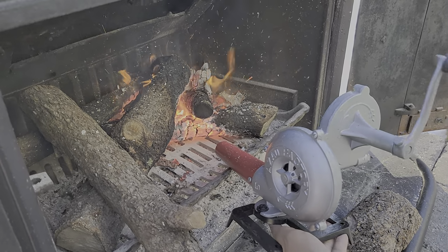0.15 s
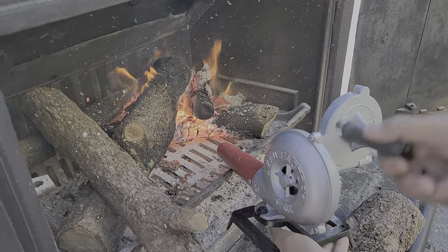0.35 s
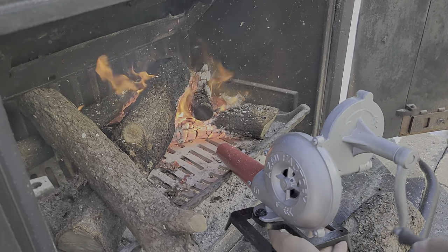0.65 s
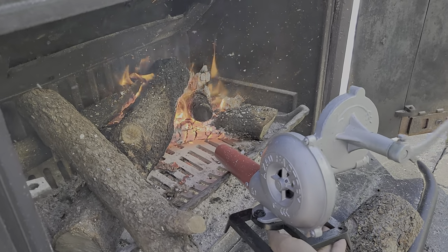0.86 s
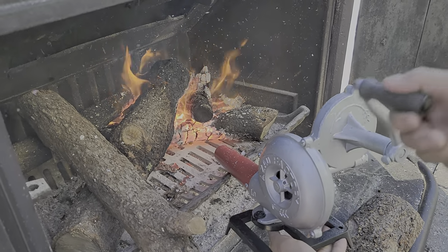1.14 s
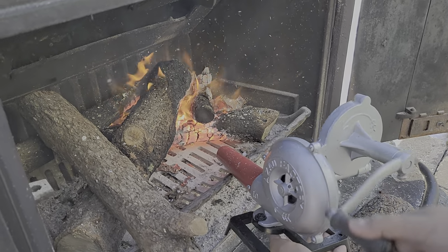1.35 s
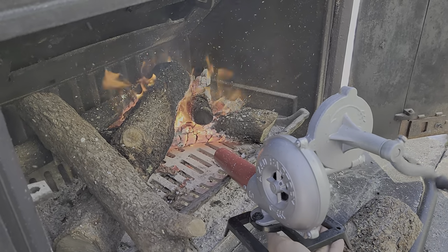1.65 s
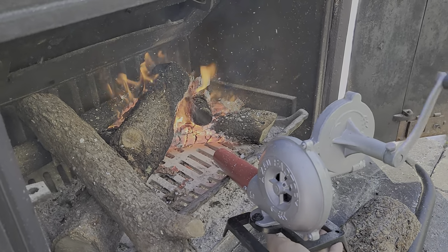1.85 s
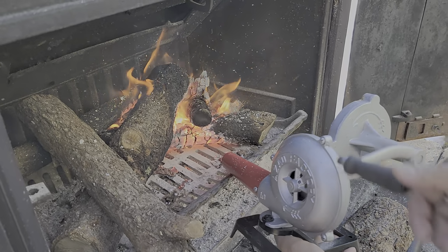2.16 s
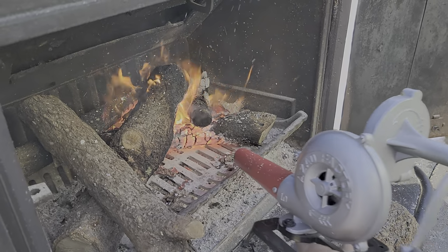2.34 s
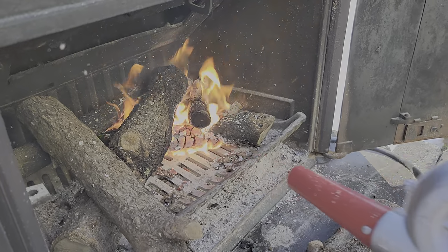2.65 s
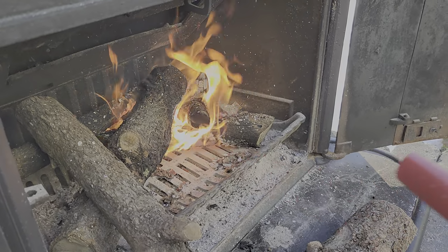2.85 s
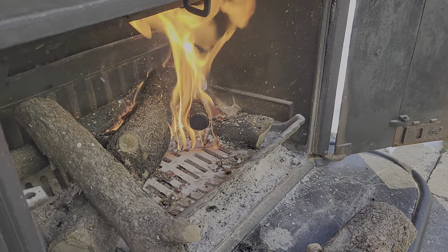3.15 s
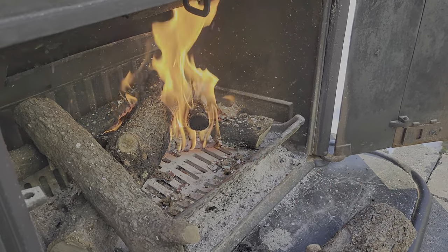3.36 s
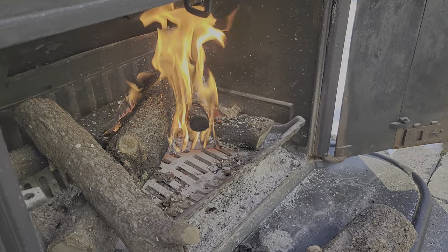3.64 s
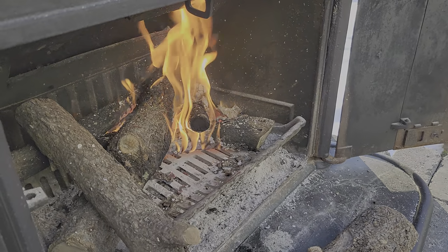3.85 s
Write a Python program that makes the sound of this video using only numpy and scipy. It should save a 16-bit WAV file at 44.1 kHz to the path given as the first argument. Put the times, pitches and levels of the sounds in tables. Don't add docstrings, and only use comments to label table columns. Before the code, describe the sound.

Close up, a loose metal crank blower clatters unevenly about thirty times a second with gear grind and deep airy roar, then coasts to a stop, while embers flare in a hiss and flames flutter softly.

```python
import sys
import numpy as np
from scipy import signal
from scipy.fft import rfft, irfft
from scipy.io import wavfile
from scipy.ndimage import uniform_filter1d, map_coordinates

SR = 44100
rng = np.random.default_rng(int(sys.argv[2]) if len(sys.argv) > 2 else 0)


def dump(signal):
    limited = np.clip(np.atleast_2d(signal).T, -1, 1)
    pcm = np.round(limited * 32767).astype(np.int16)
    wavfile.write(sys.argv[1], SR, pcm)


def amplitude_ratio(level_db):
    exponent = np.asarray(level_db, float) / 20
    return 10 ** exponent


N = 176400
LET_GO_S = 2.27

# start_s, roar_db
BLAST = [(0, -28), (.6, -28), (1.15, -29.5), (1.5, -29.5), (2.3, -29.5), (2.45, -34.5), (2.6, -36.5),
         (2.7, -43.5), (2.8, -48.5), (3.4, -52), (3.7, -51.5), (4, -47)]
# pitch_hz, level_db (per Hz)
ROAR_COLOUR = [(15, -41), (25, -24.5), (123, 2), (184, -12), (355, -5.5), (775, -17.5), (900, -15),
               (1170, -53.5), (1980, -120)]
# pitch_hz, level_db (per Hz)
FLAME_COLOUR = [(15, -60), (25, -31), (50, -4), (85, -1), (230, -12.5), (275, -10), (900, -32.5),
                (1170, -80), (1980, -120)]
# pitch_hz, width_hz, lift_db
FIREBOX_RESONANCES = [(126, 54, 3), (219.4, 17.7, 10.5)]
# pitch_hz, level_db (per Hz)
HISS_COLOUR = [(260, -31), (450, -3), (1570, -6), (4650, -10.5), (5170, -8), (10000, -20), (15100, -14.5),
               (16500, -26)]
# start_s, lift_db
EMBER_FLARE = [
    (0, -28),
    (2.4, 19),
    (2.8, 17),
    (3.1, 20.5),
    (3.25, 14),
    (3.5, 9.5),
    (4, 6.5),
]
# start_s, level_db, pitch_hz
SNAPS = [
    (0.106, -33, 6430),
    (0.1344, -28.5, 6000),
    (0.638, -33.5, 8900),
    (1.5788, -50, 5960),
    (2.175, -32.5, 7600),
    (2.21, -26, 7140),
    (2.3142, -28.5, 6760),
    (3.3733, -47.5, 6140),
    (3.8515, -57, 7000),
]
# start_s, load_db, treble_db
GEARS = [(0, -35.5, -61.5), (.2, -39.5, -55), (.45, -37.5, -54), (.7, -45, -65.5), (.97, -35.5, -56),
         (1.2, -43, -64.5), (1.55, -43, -66), (1.88, -37, -57), (2.1, -45, -63), (2.45, -35, -60),
         (2.68, -39.5, -62), (2.9, -44, -59.5), (3.2, -73, -75)]
# pitch_hz, level_db, t60_s
LOADED_HOUSING = [(650, -8, .04), (1025, 1, .07), (1280, 1, .045), (1455, -2, .06), (1775, -5, .04),
                  (2015, -4, .03), (2250, -6, .03), (2525, -6, .04), (3180, -7, .03)]
# pitch_hz, level_db, t60_s
FREE_HOUSING = [(785, 1, .033), (1445, 1, .055), (1495, 0, .05), (1680, -9, .03), (1950, -5, .04),
                (2090, -3, .035), (1040, -9, .04), (2800, -15, .03)]
# pitch_hz, level_db, t60_s
CLANK = [(5500, -5, .02), (5920, -1, .03), (6480, -2, .025), (7250, -3, .015), (7560, 1, .018),
         (9750, -6, .012)]
# pitch_hz, level_db, t60_s
GEAR_COVER = [(3480, -2, .04), (3620, -2, .03), (3780, 1, .05), (4300, -9, .025), (4490, -9, .04)]
# start_s, level_db, clank_db, cover_db
KNOCKS_EARLY = [(0.0245, -29, -17, -23), (0.051, -23.5, -19.5, -32), (0.0735, -23.5, -14.5, -19),
                (0.1116, -25.5, -10.5, -7), (0.1389, -20, -24, -18), (0.1703, -16, -14.5, -11),
                (0.1996, -17.5, -16.5, -14), (0.2289, -25, -13, -7), (0.2586, -30, -11, -6),
                (0.2887, -37, -24, -16), (0.319, -35, -23, -4), (0.3473, -28, -15, -8),
                (0.376, -18.5, -14.5, -8), (0.4085, -19, -12.5, -9), (0.4411, -23.5, -18, -15),
                (0.4702, -20.5, -19, -16), (0.5186, -23.5, -37, -23), (0.5637, -20.5, -24, -31),
                (0.5916, -23, -19, -28), (0.622, -28, -13, -26), (0.6592, -28, -27, -34),
                (0.6847, -31, -24, -19), (0.7146, -29.5, -19, -21), (0.7558, -32, -34, -37),
                (0.7897, -19, -18, -17), (0.8212, -18, -18, -15), (0.878, -50, -14, -8),
                (0.9155, -22, -17, -8), (0.942, -27, -12, -22), (0.9726, -23.5, -11.5, -11),
                (1.0191, -24, -17.5, -25), (1.0535, -22, -18, -12), (1.078, -29, -20, -23),
                (1.1085, -32.5, -24, -30), (1.151, -30, -30, -32)]
KNOCKS_LATE = [(1.15, -34, -26, -30), (1.186, -45, -30, -20), (1.2206, -31, -30, -26),
               (1.2521, -22.5, -31, -24), (1.287, -19, -18, -12), (1.321, -23, -39, -26),
               (1.3532, -36, -29, -25), (1.3763, -33, -32, -21), (1.4105, -23, -28, -19),
               (1.4436, -29, -18, -13), (1.4826, -30, -24, -27), (1.5237, -29.5, -34, -25),
               (1.5447, -35, -32, -31), (1.5931, -26, -37, -20), (1.6227, -24.5, -17, -9.5),
               (1.6514, -24, -30, -17), (1.6864, -18, -17, -9.5), (1.718, -34, -9, -25),
               (1.745, -40, -37, -24), (1.7704, -42, -25, -11), (1.8012, -22.5, -19, -31),
               (1.8315, -26.5, -9, -12), (1.8713, -19, -16, -11), (1.903, -19, -15.5, -8),
               (1.959, -23.5, -15.5, -14), (2.001, -32, -34, -25), (2.0311, -20, -20, -18),
               (2.0678, -22, -19, -9.5), (2.1057, -25.5, -17, -12), (2.1379, -36, -24, -13),
               (2.173, -23, -1.5, -9), (2.2119, -31, -13, -6), (2.2458, -28, -15, -23),
               (2.2683, -30, -21, -19), (2.2982, -22, -15, -10.5)]
KNOCKS_COAST = [(2.356, -24, -22, -18), (2.393, -31, -13, -12), (2.426, -28, -19, -10),
                (2.467, -26, -32, -16), (2.512, -26, -15, -8), (2.525, -34, -17, -10),
                (2.558, -24.5, -18, -12), (2.61, -18.5, -16, -11.5), (2.658, -18.5, -17, -17),
                (2.714, -15.5, -27, -47), (2.763, -23.5, -22, -19), (2.827, -32.5, -21, -17),
                (2.881, -23.5, -25, -35), (2.943, -45, -17, -20), (2.962, -32.5, -23, -33),
                (2.985, -39, -10, -19), (3.054, -40.5, -10, -21), (3.071, -38, -14, -31)]
# pitch_hz, echo_db
WALL_ECHO = [(500, -2.5), (1500, -7.5), (3000, -3), (6000, 0)]
# pitch_hz, likeness (0 to 1)
PORT_LIKENESS = [(100, 0.97), (300, 0.99), (600, 0.35), (3000, 0.06)]
# start_s, lag_samples
LEFT_LAG = [(0, 6.17), (2, 5.85), (2.7, 11.9), (4, 19.6)]
# pitch_hz, level_db
LEFT_TILT = [(100, 0), (350, -2.5), (1400, 0.5), (5000, 0.5), (13000, -4.5)]


def evened(x):
    return x / np.sqrt(np.mean(x ** 2) + 1e-20)


def peaked(x):
    return x / np.sqrt(np.max(uniform_filter1d(x ** 2, size=200)))


def read(points, hz):
    f, value = np.transpose(points)
    return np.interp(np.log(hz + 1), np.log(f + 1), value)


def along(table, t, column=1):
    rows = np.array(table, float)
    return np.interp(t, rows[:, 0], rows[:, column])


def add(mix, start_s, sound):
    part = mix[max(round(start_s * SR), 0):][:len(sound)]
    part += sound[:len(part)]


def steep(x, lo_hz, hi_hz):
    band = signal.butter(4, [lo_hz, min(hi_hz, 21000)], "band", fs=SR, output="sos")
    return evened(signal.sosfilt(band, x))


def ring(modes, luck):
    hz, db, t60 = np.transpose(modes)[:, :, None]
    t, count = np.arange(3000) / SR, len(modes)
    hz = hz * (1 + 0.016 * luck[:count, None])
    db = db + 3.5 * luck[-count:, None]
    sines = amplitude_ratio(db - 60 * t / t60) / np.sqrt(t60) * np.sin(2 * np.pi * hz * t)
    wave = sines.sum(0)
    return wave / np.linalg.norm(wave)


def wash(shape_db, patchy_db, size):
    frames, hz = 4 * N // size + 5, np.fft.rfftfreq(size, 1 / SR)
    a, b, c, d, patches = rng.standard_normal((frames, len(hz), 5)).T
    patches = uniform_filter1d(patches, size=5, axis=0)
    patches = evened(uniform_filter1d(patches, size=6, axis=1))
    same = np.clip(read(PORT_LIKENESS, hz), 0, 1)[:, None]
    left = a + 1j * b
    right = same * left + np.sqrt(1 - same ** 2) * (c + 1j * d)
    frame_s = np.arange(frames) * size / 4 / SR
    z = np.array([left, right]) * amplitude_ratio(shape_db(hz[:, None], frame_s) + patchy_db * patches)
    return evened(signal.istft(z, nperseg=size, noverlap=3 * size // 4)[1][:, :N])


def ember_hiss():
    def hiss_db(hz, s):
        return read(HISS_COLOUR, hz) - 40 * (hz < 400) + 0 * s
    hiss = wash(hiss_db, patchy_db=1.9, size=512)
    return hiss * amplitude_ratio(-73 + along(EMBER_FLARE, np.arange(N) / SR))


def fire_roar():
    def roar_db(hz, s):
        share = np.clip((along(BLAST, s) + 48) / 12, 0, 1)
        box = sum(db * np.exp(-((hz - f) / width) ** 2) for f, width, db in FIREBOX_RESONANCES)
        fed = read(ROAR_COLOUR, hz) + box
        return share * fed + (1 - share) * read(FLAME_COLOUR, hz) - 30 * (hz / 1500) ** 2
    roar = wash(roar_db, patchy_db=1.2, size=2048)
    swell = np.sqrt(uniform_filter1d((roar ** 2).mean(0), size=22050) + 1e-9)
    return roar / swell * amplitude_ratio(along(BLAST, np.arange(N) / SR))


def snaps():
    out, t = np.zeros(N), np.arange(800) / SR
    for start_s, db, hz in SNAPS:
        burst = rng.standard_normal(800) * np.minimum(t / 0.00061, 1) * np.exp(-t / 0.0044)
        pop = steep(burst, hz * 0.5, hz * 1.21)
        pop = pop + amplitude_ratio(-9.5) * steep(pop, 8300, 21800)
        add(out, start_s, amplitude_ratio(db - 5.5) * pop / np.sqrt(np.mean(pop[:150] ** 2)))
    return out


def gears():
    t, no_luck = np.arange(N) / SR, np.zeros(30)
    contacts_per_s = 3300
    teeth = rng.standard_normal((4, N)) * (rng.random((4, N)) < contacts_per_s / SR)
    uneven = np.minimum(rng.exponential(1, (4, N)), 3)
    flicker = evened(uniform_filter1d(rng.standard_normal(N), size=400))
    teeth *= amplitude_ratio(2.5 * uneven + 3.5 * flicker)
    grit = teeth[1] + 0.96 * teeth[2:]
    free = np.clip((t - LET_GO_S) / 0.053, 0, 1)

    def rung(modes):
        return evened(signal.oaconvolve(teeth[0], ring(modes, no_luck))[:N])
    low = (1 - free) * rung(LOADED_HOUSING) + free * rung(FREE_HOUSING[1:])
    low = low + amplitude_ratio(-9.3 * free) * steep(grit, 870, 2920)
    high = rung(CLANK) + amplitude_ratio(2.5 - 17.5 * free) * rung(GEAR_COVER)
    high = high + amplitude_ratio(4.5) * steep(grit, 3380, 6900)
    high = high + amplitude_ratio(-16.5) * steep(rng.standard_normal((2, N)), 8300, 19000)
    stop = np.clip((3.3 - t) / 0.23, 0, 1)
    return stop * (amplitude_ratio(along(GEARS, t)) * low + amplitude_ratio(along(GEARS, t, column=2)) * high)


def knock(body, skin_db, db, clank_db, cover_db):
    t, rise_s, rattle_s, chips_per_s = np.arange(3000) / SR, .0038, .0048, 2000
    swell = (t / rise_s) ** 2 * np.exp(-2 * t / rise_s)
    rattle = 0.022 * np.exp(-t / rattle_s) * (t > rise_s)
    chips = rng.standard_normal(3000) * (0.35 + (rng.random(3000) < chips_per_s / SR) * 2.8)
    chips = chips * (swell + rattle)
    luck, (late, size) = rng.standard_normal((3, 30)), rng.random(2)
    luck[0, 15:] *= amplitude_ratio(skin_db)
    luck[2, :15] /= 2
    onset = np.minimum(t / rise_s, 1) ** 2
    low, high, cover = [peaked(ring(modes, k) * onset) for modes, k in zip((body, CLANK, GEAR_COVER), luck)]
    bounce = np.roll(low, round(.006 * (0.636 + late) * SR))
    low = low + 0.55 * size * bounce + amplitude_ratio(skin_db) * peaked(steep(chips, 840, 3330))
    high = high + amplitude_ratio(1) * peaked(steep(chips, 3750, 8030)) + amplitude_ratio(-15) * peaked(steep(chips, 12000, 16030))
    cover = cover + peaked(steep(chips, 2820, 4630))
    clank = amplitude_ratio(clank_db + 2) * np.roll(peaked(high), 40)
    return amplitude_ratio(db - 6.5) * (peaked(low) + clank + amplitude_ratio(cover_db + 6) * peaked(cover))


def shaft_knocks():
    out = np.zeros(N)
    lifted_s, grazing_s = 2.54, 2.93
    turns = ((KNOCKS_EARLY, LOADED_HOUSING, 0), (KNOCKS_LATE, LOADED_HOUSING, 0), (KNOCKS_COAST, FREE_HOUSING, -10))
    for table, housing, skin_db in turns:
        for start_s, db, clank_db, cover_db in table:
            lowest_held = LET_GO_S < start_s < lifted_s or start_s > grazing_s
            body = housing[1:] if lowest_held else housing
            add(out, start_s - .0025, knock(body, skin_db, db, clank_db, cover_db))
    return out


def iron_walls(x):
    k, t60_s, sways_per_s = np.arange(6000), .024, 7.3
    taps = rng.standard_normal((3, 2, 6000)) * (rng.random((3, 2, 6000)) < .1)
    taps = taps * amplitude_ratio(-60 * k / SR / t60_s) * (k > 20)
    taps = taps / np.linalg.norm(taps, axis=2, keepdims=True)
    phase = np.arange(3)[:, None, None] / 3
    sway = np.sqrt(2 / 3) * np.cos(np.pi * (sways_per_s * np.arange(N) / SR + phase))
    echoes = signal.oaconvolve(x * sway, taps, axes=2)[..., :N].sum(0)
    return irfft(rfft(echoes) * amplitude_ratio(read(WALL_ECHO, np.fft.rfftfreq(N, 1 / SR))), N)


def microphone_ports(x, bed):
    t, hz = np.arange(N), np.fft.rfftfreq(N, 1 / SR)
    left, right = x + iron_walls(x) + bed
    late = map_coordinates(left, [t - along(LEFT_LAG, t / SR)], order=3, mode="nearest")
    tilt = amplitude_ratio(read(LEFT_TILT, hz) / 2)
    edge = hz < 16100
    return np.array([irfft(rfft(late) * tilt * edge, N), irfft(rfft(right) * edge / tilt, N)])


def scene():
    blower = shaft_knocks() + gears() + snaps()
    fire = fire_roar() + ember_hiss()
    return microphone_ports(blower, fire)


def top_cut(x):
    return signal.sosfilt(signal.butter(12, 16660, fs=SR, output="sos"), x)


def record(dry):
    return top_cut(dry)


dry = scene()
out = record(dry)
dump(out)
```